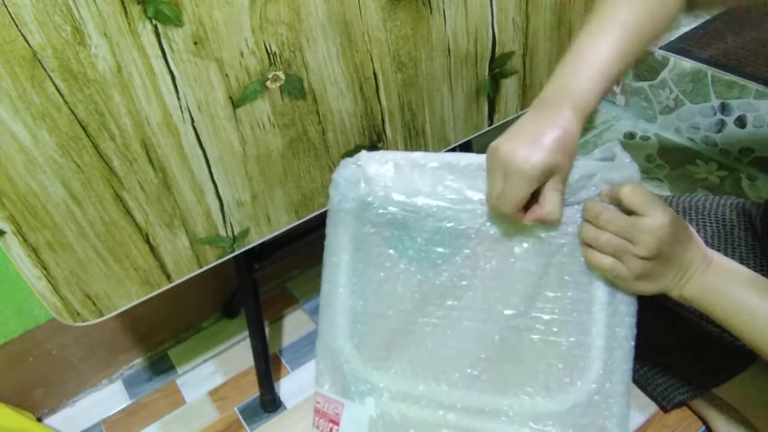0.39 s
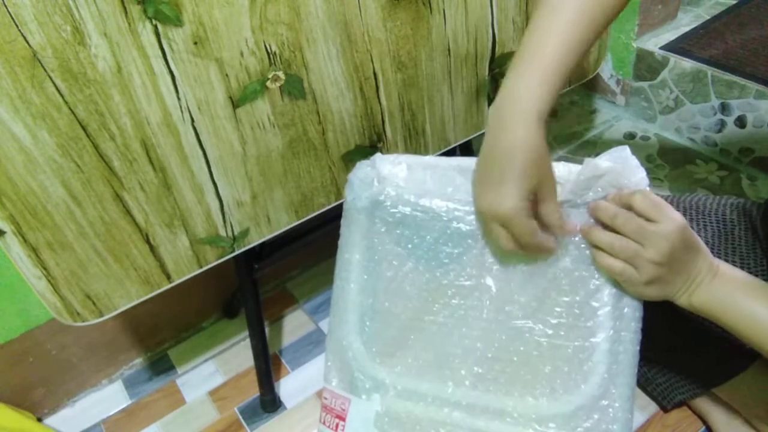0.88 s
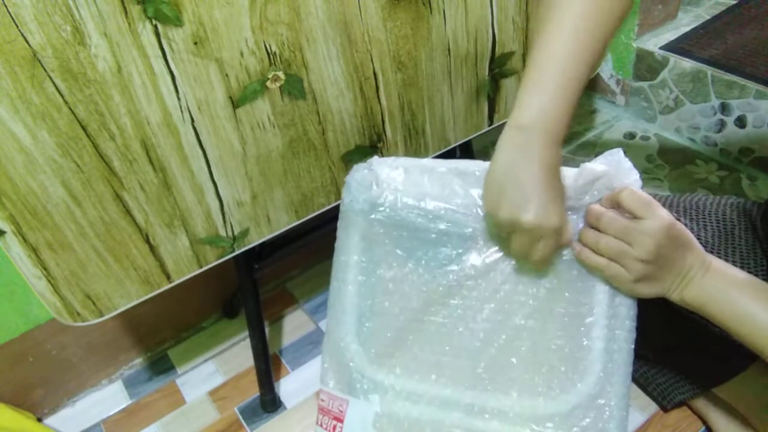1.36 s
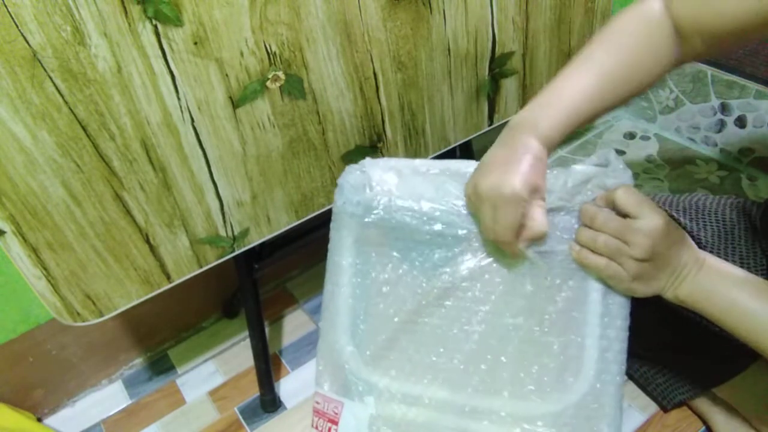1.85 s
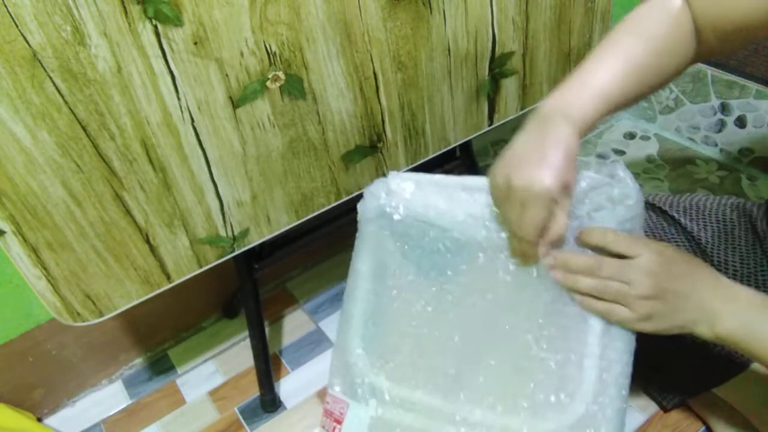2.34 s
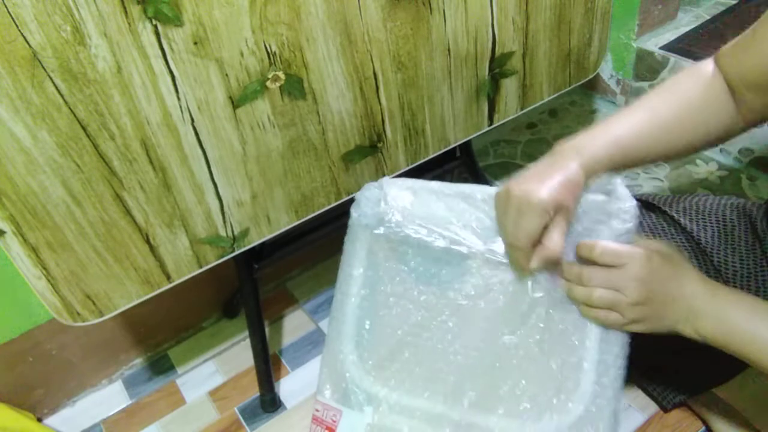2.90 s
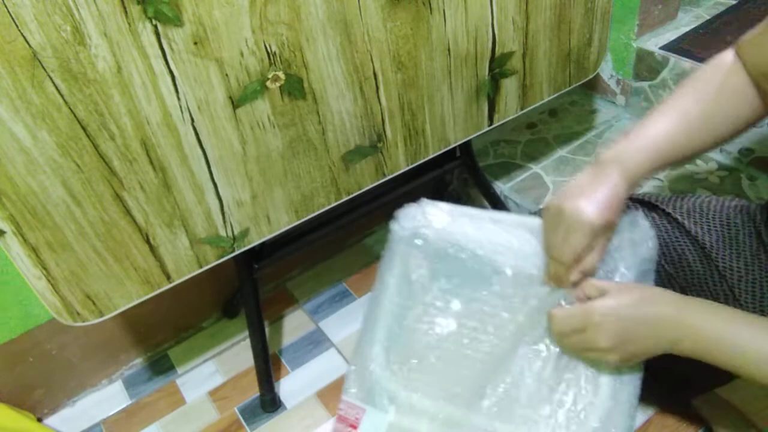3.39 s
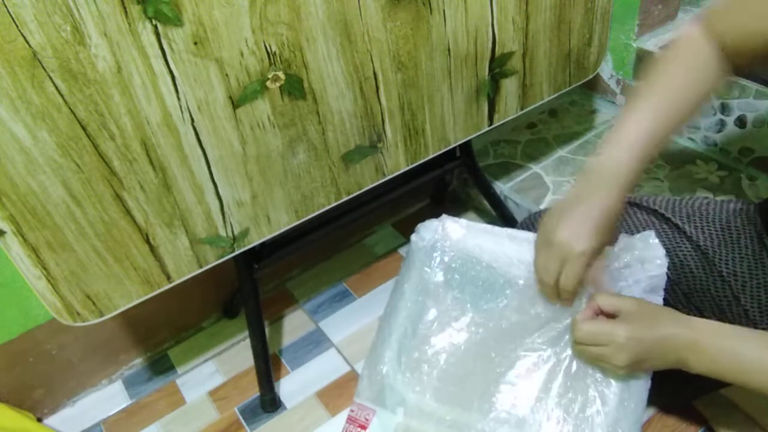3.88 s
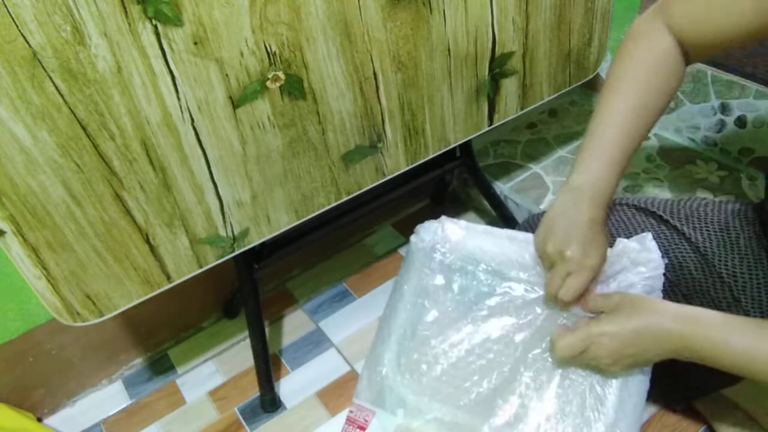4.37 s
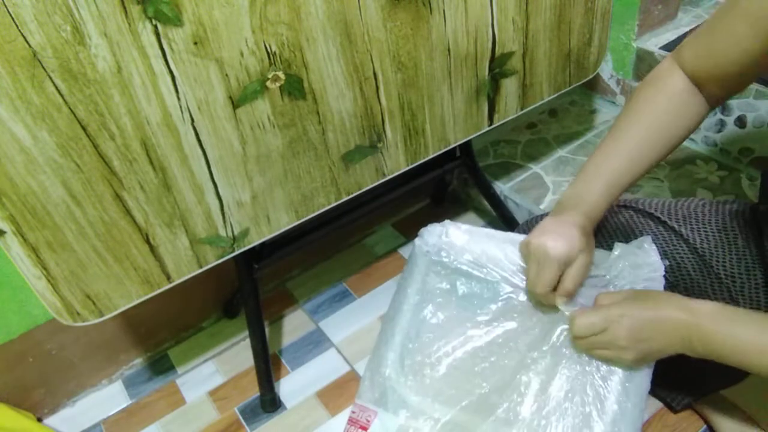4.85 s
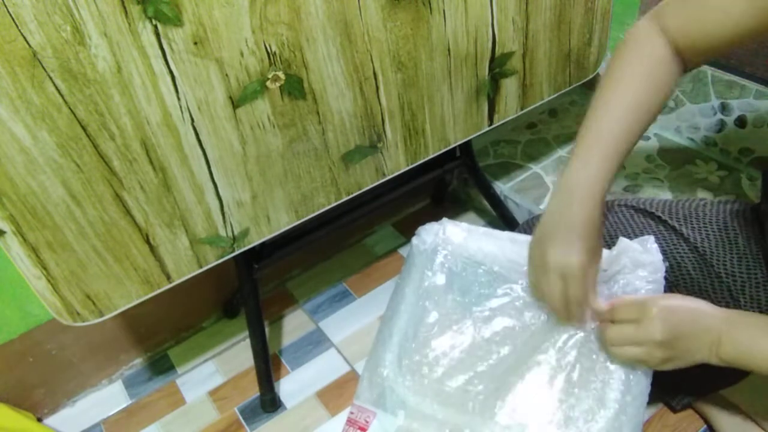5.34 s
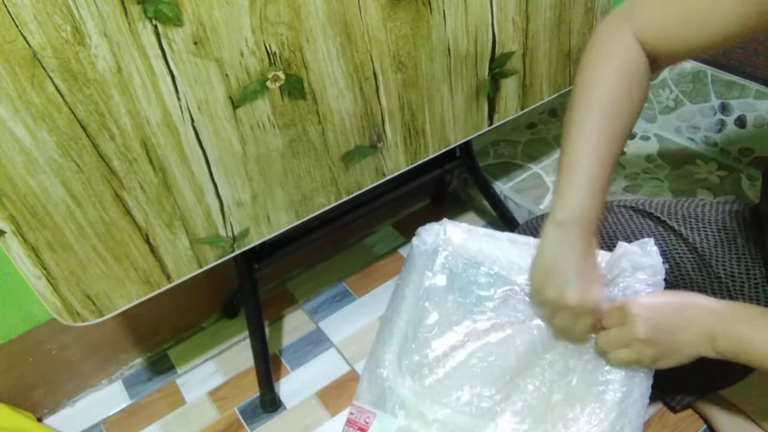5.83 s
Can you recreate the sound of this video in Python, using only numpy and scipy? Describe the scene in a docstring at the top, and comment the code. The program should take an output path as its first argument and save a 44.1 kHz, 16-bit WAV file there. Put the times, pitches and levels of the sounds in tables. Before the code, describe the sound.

Close to the microphone, hands pull plastic wrapping on a hollow box in a small hard-tiled room. Bright snaps come in irregular clusters, loud in the first half second, around one and a half seconds and strongest near 2.7, over a fine rustle of tiny pops. Soft hollow knocks accompany some snaps. Later the handling is lighter, above a faint low rumble.

```python
"""Fingers pick and pull at plastic film over a bubble-wrapped box, close by in a small tiled room.
Film: snaps of the creases, and a rustle of tiny pops between them, are short puffs of filtered noise.
Box: knocks and rubbing fingers excite hollow resonances and a dull thud from what the box rests on.
Nearby surfaces and the walls send the sounds back.
Under it all lies a low rumble of filtered noise, with a wavering hum late on."""
import sys
import numpy as np
from scipy import signal
from scipy.fft import rfft, irfft
from scipy.io import wavfile
from scipy.ndimage import uniform_filter1d, map_coordinates

SR = 44100
rng = np.random.default_rng(int(sys.argv[2]) if len(sys.argv) > 2 else 0)


def digitize_waveform(pressure):
    """Quantize a signal to 16-bit integers and store it at the path in sys.argv[1].

    Rows of a 2-D input are taken as channels; values are limited to [-1, 1].
    """
    field = np.atleast_2d(pressure).T
    bounded = np.clip(field, -1, 1)
    quanta = np.round(bounded * 32767).astype(np.int16)
    wavfile.write(sys.argv[1], SR, quanta)


def gain_from_db(level_db):
    """Convert decibel levels to linear amplitude factors (20 dB per decade)."""
    decades = np.asarray(level_db, float) / 20
    return 10 ** decades


N = 263718  # length in samples


# Loud snaps of the film, levels before the balance of the four parts is set:
# start_s [s], edge_db [dB], crease_db [dB over the edge], flap_db [dB over the edge]
FILM_SNAPS = [(0.0789, -23, -15.5, -14.5), (0.1227, -13, -9.5, -10.5), (0.148, -21, -18, -24),
              (0.177, -21, -19, -16), (0.2618, -14, -19, -19), (0.2795, -19, -14, -26),
              (0.2933, -8, -13, -11), (0.3036, -6, -9.5, -20.5), (0.3098, -9, -15, -12),
              (0.38, -19, -22, -22), (0.4227, -13, -9, -18.5), (0.6447, -19, -10.5, -12),
              (0.7834, -26.5, -11.5, -13.5), (0.8729, -24.5, -21, -18), (0.8772, -25.5, -7.5, -10.5),
              (0.8857, -23.5, -12, -24), (0.9885, -29, -16, -23), (1.03, -25, -13, -6.5),
              (1.065, -33, 3.5, -5), (1.106, -26.5, -9.5, -11), (1.2198, -32.5, -9, -5),
              (1.231, -19, -16.5, -32), (1.2444, -25.5, -18, -17), (1.2821, -26.5, -8.5, -33),
              (1.4346, -5, -13.5, -18.5), (1.4548, -19, -3.5, -16), (1.5206, -17.5, -16.5, -25),
              (1.542, -5, -11, -19), (1.6317, -27, -11, -16), (1.9069, -23.5, -17, -18),
              (1.9225, -16, -12, -16.5), (1.99, -24, -9.5, -22), (2.0226, -18.5, -11, -11),
              (2.054, -30, -14, -11), (2.0813, -27.5, -19, -9), (2.0867, -24, -12, -17),
              (2.3995, -28.5, -7.5, -9), (2.4654, -29, -27, -27), (2.476, -26, -27, -28),
              (2.4927, -25.5, -28, -38), (2.5314, -25.5, -24, -22), (2.5733, -24.5, -35, -24),
              (2.614, -25.5, -15, -19), (2.6667, -2, -12, -13), (2.6796, -16, -7, -15),
              (2.6893, -6, -12.5, -13), (2.7235, -14.5, -6, -14.5), (2.8803, -33, -4.5, -12),
              (2.9169, -38, -2, -1), (2.9887, -27, -6, -3.5), (3.0001, -30.5, -1.5, -7),
              (3.0746, -25, -9.5, -17), (3.112, -35, -6, -15), (3.2936, -31, -17, -19),
              (3.5218, -43.5, 0.5, -5), (3.6894, -28, -14.5, -20), (3.752, -26, -10, -12),
              (3.8065, -31, -4, -12), (4.0196, -17, -17, -23), (4.0346, -27.5, -12, -11),
              (4.2603, -28, -28, -35), (4.4107, -25, -24, -26), (4.4386, -31.5, -0.5, -17),
              (4.4572, -24, -17, -18), (4.513, -28, -7, -13), (4.5198, -31.5, 1.5, -14),
              (4.5371, -25.5, -9, -10), (4.563, -27.5, -9.5, -8.5), (4.6318, -30, -7.5, -12),
              (4.7501, -29.5, -10, -26), (4.7675, -27.5, -8, -17), (4.8002, -21.5, -22, -33),
              (4.9279, -28.5, -27, -41), (5.225, -19, -9.5, -14.5), (5.2776, -24, -8, -23),
              (5.31, -31, -19, -8), (5.441, -43, -7, -21), (5.5, -42.5, 0, 2.5), (5.5365, -32.5, -6, -25),
              (5.6162, -34, -4, -10.5), (5.697, -25.5, -14, -21), (5.802, -28, 2, -8.5),
              (5.887, -16.5, -20, -30)]
# Colour of a snap's bright edge: pitch_hz [Hz], level_db [relative dB per Hz]
EDGE_COLOUR = [(3530, -43.5), (6000, -7), (6960, -3.5), (8030, 0.5), (9230, -8), (9980, -10),
               (16000, -46.5)]
# Colour of the creases in the middle of a snap: pitch_hz [Hz], level_db [relative dB per Hz]
CREASE_COLOUR = [(2200, -23.5), (3100, -3.5), (4600, -1.5), (5300, -2.5), (6100, -1.5), (8000, -27)]
# Colour of the flapping sheet: pitch_hz [Hz], level_db [relative dB per Hz]
FLAP_COLOUR = [(590, -13.5), (1000, -2.5), (1080, 0.5), (1950, 8), (2420, 2), (3200, -5.5), (4160, -69),
               (7040, -120)]
# Colour of a snap's sharpest corner: pitch_hz [Hz], level_db [relative dB per Hz]
SIZZLE_COLOUR = [(8500, -28), (11500, 16), (16000, 1)]


def film():
    """Each buckle cracks at four sizes of crease; smaller ones tick and crackle all the while."""
    edge, crease = causal(EDGE_COLOUR), causal(CREASE_COLOUR)
    flap, sizzle = causal(FLAP_COLOUR), causal(SIZZLE_COLOUR)

    # loud snaps: the flap lasts longest, then the edge, the crease and the sizzle
    s, db, crease_db, flap_db = np.transpose(np.vstack([FILM_SNAPS, slips(count=7)]))
    each = np.ones(len(s))
    snaps = bursts(s, db - 4.5, 0.001764 * each, edge, size=512)
    snaps += bursts(s, db + crease_db + 5, 0.0012495 * each, crease, size=512)
    snaps += bursts(s, db + flap_db + 0.5, 0.002744 * each, flap, size=512)
    snaps += bursts(s, db - 16.5, 0.0007595 * each, sizzle, size=512)

    # rustle: the fingers never pull evenly
    pull_db, weight_db = hands()
    crackle_db = pull_db + 0.1 * wobble(rate=18)
    pops = gain_from_db(crackle_db - 6) * crackle(spread_db=1.5, life_s=0.0012, clump=0.5, count=2400)
    pops += gain_from_db(crackle_db - 9) * crackle(spread_db=3.0, life_s=0.0011, clump=0.3, count=260)
    folds = gain_from_db(crackle_db - 3) * crackle(spread_db=3.5, life_s=0.0012, clump=0.5, count=900)
    rustle = coloured(pops, edge)
    rustle += gain_from_db(-5) * coloured(pops + 0.78 * folds, crease)
    # a light touch crinkles crisper, a heavy one brings out the flap of the sheet
    rustle += coloured(gain_from_db(-20 - 0.65 * weight_db) * folds, sizzle)
    rustle += coloured(gain_from_db(-4.5 + 0.4 * weight_db) * (0.69 * pops + 0.28 * folds), flap)
    return snaps + rustle


def slips(count):
    """Stuck film peels off in ever quicker slips; gives rows with the columns of the snaps."""
    first_s, gap_s, quickens = 1.362, 0.0124, 0.87  # first slip, first gap, each gap over the last
    k = np.arange(count)
    s = first_s + gap_s * (1 - quickens ** k) / (1 - quickens)
    db = -19.5 + 4.5 * (k == 0)  # the first slip breaks away louder
    return np.transpose(np.broadcast_arrays(s, db, -10.5, -15.5))


# The fingers grip and pull the film:
# start_s [s], held_s [s], pull_db [dB], weight_db [dB, how hard they lean on the box]
PULL_GRIPS = [(-.02, 0.017, -30, -3.5), (.06, 0.027, -51, 7), (.14, 0.11, -43, -4), (.33, 0.13, -44.5, -2),
              (0.499, 0.14, -44.5, -4), (.66, .14, -51, 4.5), (.90, 0.093, -50.5, 9.5),
              (1.02, .12, -46.5, 0.5), (1.22, 0.13, -45, 8), (1.34, 0.12, -38.5, 2.5),
              (1.598, 0.23, -47, -4.5), (1.899, 0.14, -47, 7), (2.00, 0.069, -38, 2.5),
              (2.12, 0.13, -50, 5), (2.299, 0.14, -50.5, -3.5), (2.471, 0.26, -43.5, -7.5),
              (2.78, 0.075, -45, -5.5), (2.891, 0.11, -41, 4), (2.97, 0.071, -43, 2.5),
              (3.03, 0.095, -48.5, 7.5), (3.13, 0.22, -59.5, 11.5), (3.288, .16, -49, -1),
              (3.498, 0.04, -44.5, 2), (3.689, 0.12, -48, 5), (3.90, 0.23, -46, 6),
              (4.009, 0.03, -39.5, -2), (4.09, .05, -48.5, -1), (4.198, 0.044, -43, 1),
              (4.282, 0.11, -46.5, -1.5), (4.40, .26, -44.5, -2.5), (4.67, 0.14, -45.5, -5),
              (4.84, 0.17, -49.5, -13), (4.981, 0.086, -40.5, -3), (5.08, 0.078, -46, 6.5),
              (5.208, 0.09, -44, 4.5), (5.44, .23, -51, -3), (5.698, 0.14, -48.5, 1),
              (5.79, .22, -45.5, -6.5)]


def hands():
    """Pull and weight in dB at each moment: every grip rises, holds and lets go."""
    grip_s, let_go_db_per_s, rest_db = 0.039, 330, -59
    s, held_s, db, weight_db = np.transpose(PULL_GRIPS)[:, :, None]
    coarse = np.arange(0, N, 32)  # every 32nd sample is enough
    t = coarse / SR - s
    rise = np.clip(t / grip_s + 0.5, 0, 1) ** 2  # builds around the start of the pull
    slack_db = let_go_db_per_s * np.maximum(t - held_s, 0)
    power = rise * gain_from_db(2 * (db - slack_db))
    total = power.sum(axis=0) + gain_from_db(2 * rest_db)
    pull = 10 * np.log10(total)
    weight = (power * weight_db).sum(axis=0) / total
    return [np.interp(np.arange(N), coarse, row) for row in (pull, weight)]


def crackle(spread_db, life_s, clump, count):
    """Tiny white pops come in clumps; a positive spread makes a few louder, a negative one a few softer."""
    chance = rng.random((count, 3))
    odds = np.cumsum(np.exp(clump * wobble(rate=40)))
    s = np.interp(chance[:, 0], odds / odds[-1], np.arange(N) / SR)
    size_db = np.minimum(-spread_db * np.log(chance[:, 1] + 1e-9), 3 * spread_db)
    lives_s = life_s * (0.5 + chance[:, 2])
    white = np.eye(128)[0]
    pops = unit(bursts(s, size_db, lives_s, white, size=128)[0])
    # partly even out the slow changes in strength
    strength = np.abs(uniform_filter1d(uniform_filter1d(pops ** 2, size=2500), size=2500))
    return unit(pops / (strength + 0.1) ** 0.4)


def bursts(s, db, life_s, response, size):
    """Puffs of coloured noise that swell, hold for about their life, then die; db is the held level.
    Row 0 is what one direction gets, row 1 the even colour that all directions send to the walls."""
    u = np.arange(size) / SR / life_s[:, None]  # time in lives
    swell = (1 - np.exp(-u / 0.28)) * gain_from_db(-22 * np.maximum(u - 0.6, 0))
    strength = (gain_from_db(db) * np.linalg.norm(swell, axis=1))[:, None]
    noise = swell * rng.standard_normal(u.shape)
    puffs = signal.fftconvolve(noise, response[None, :size], axes=1)
    puffs *= strength / np.linalg.norm(puffs, axis=1)[:, None]
    clicks = strength * np.pad(response[:size], (0, size - 1))
    # add every puff and click at its own place in time
    at = np.round(s * SR).astype(int)[:, None] + np.arange(2 * size - 1)
    return np.array([np.bincount(at.ravel(), rows.ravel(), N + 2 * size)[:N] for rows in (puffs, clicks)])


# Fingers knock the box, levels before the balance of ring and thud is set:
# start_s [s], ring_db [dB], thud_db [dB over the ring]
BOX_KNOCKS = [(0.122, -27.5, -20.5), (0.261, -41, -24), (0.292, -16.5, -31), (0.303, -22, -24),
              (0.423, -26.5, -25), (0.642, -34, -15), (1.112, -30, -21.5), (1.135, -35.5, -19),
              (1.363, -36, -35), (1.434, -33, -43), (1.541, -37.5, -19), (1.904, -43.5, -20),
              (2.022, -41, -10), (2.055, -37, -6), (2.08, -29.5, -12), (2.179, -37, -17.5),
              (2.499, -40.5, -9.5), (2.666, -31, -17), (2.69, -27.5, -36), (2.92, -43.5, -8.5),
              (2.999, -46, -9), (3.067, -38.5, -7.5), (3.524, -43, -23), (3.752, -38.5, -33),
              (3.937, -32, -19.5), (3.95, -37, -22), (3.969, -43, -12), (4.025, -45, -21),
              (4.118, -51.5, 2.5), (4.219, -52, -2), (5.07, -43, -33.5), (5.124, -41, -7),
              (5.225, -44, -12), (5.306, -41.5, -9)]
# Resonances of the hollow box: pitch_hz [Hz], width_hz [Hz], level_db [relative dB]
BOX_RESONANCES = [(491, 93, 1), (749, 113, 6), (916, 76, 3.5), (1260, 570, -3.5)]
# Colour of the thud of what the box rests on: pitch_hz [Hz], level_db [relative dB per Hz]
THUD_COLOUR = [(75, -45.5), (120, -8.5), (215, -0.5), (360, 2.5), (600, -17.5)]


def box():
    """A knock rings the box briefly and thuds into its support; sliding fingers stir both."""
    hollow, support = ringing(BOX_RESONANCES), causal(THUD_COLOUR)
    s, db, thud_db = np.transpose(BOX_KNOCKS)
    blows = bursts(s, db + 3.5, np.full(len(s), 0.0018), hollow, size=1024)
    thuds = bursts(s, db + thud_db + 9.5, np.full(len(s), 0.004), support, size=1024)
    # the box is rubbed more as the pull and the weight grow
    pull_db, weight_db = hands()
    rub_db = -62.5 + 0.66 * (pull_db - pull_db.mean()) + weight_db
    rub = gain_from_db(rub_db) * crackle(spread_db=-1.0, life_s=0.0025, clump=0.6, count=1200)
    stirred = gain_from_db(-1) * hollow[:4096] + gain_from_db(-10) * support  # both 4096 samples long
    return blows + thuds + coloured(rub, stirred)


def ringing(modes, size=8192):
    """Response of energy 1 of a row of resonances, added with alternating sign."""
    f = np.fft.rfftfreq(size, 1 / SR)
    total = 0
    for k, (centre, width, db) in enumerate(modes):
        damping = 1j * f * width
        total = total + (-1) ** k * gain_from_db(db) * damping / (centre * centre - f * f + damping)
    response = irfft(total)
    return response / np.linalg.norm(response)


# Echoes off the box top, table and floor: delay_ms [ms, before its random shift], level_db [dB]
NEAR_ECHOES = [(1.601, -13.5), (3.098, -9.5), (5.001, -32.5)]


def nearby(x, size=2000):
    """Nearby surfaces return each sound upside down within a few ms.
    The delays are drawn anew for each short stretch, so the echoes do not sound pitched."""
    ms, db = np.transpose(NEAR_ECHOES)
    out = np.pad(x, (0, SR))
    for start in range(0, N, size):
        piece = x[start:start + size]
        lags = np.round(ms * rng.uniform(0.85, 1.15, len(ms)) * SR / 1000).astype(int)
        for lag, gain in zip(lags, gain_from_db(db)):
            out[start + lag:][:len(piece)] -= gain * piece
    return out[:N]


# How long the tiled room rings: pitch_hz [Hz], t60_s [s to fall by 60 dB]
ROOM_DECAY = [(200, 0.23), (600, 0.15), (1500, 0.25), (4000, 0.23), (9000, 0.18), (15000, 0.12)]


def room(x, size=3000):
    """Tiled walls answer with fading noise.
    Each short stretch gets a new random tail, so no single tail colours all sounds."""
    out = np.zeros(N + SR)
    for start in range(0, N, size):
        hz, t, z = signal.stft(rng.standard_normal(SR // 2), SR, nperseg=256)
        fade = gain_from_db(-60 * t / along(ROOM_DECAY, hz)[:, None])
        tail = signal.istft(z * fade, SR, nperseg=256)[1]
        tail *= 1 - np.exp(-np.arange(len(tail)) / SR / 0.0064)  # the first walls are a few ms away
        wet = signal.fftconvolve(x[start:start + size], tail / np.linalg.norm(tail))
        out[start:][:len(wet)] += wet
    return out[:N]


# Colour of the rumble: pitch_hz [Hz], level_db [relative dB per Hz]
RUMBLE_COLOUR = [(24, -52), (40, -22), (102, 2), (373, -38), (506, 2), (600, -21), (780, -12), (1320, -120)]
# Course of the rumble, before its random wavering: time_s [s], level_db [dB]
RUMBLE_COURSE = [(0.0, -70), (3.4, -77), (5.98, -81.5)]
# Course of the hum: time_s [s], level_db [dB]
HUM_COURSE = [(4.85, -91), (5.0, -68), (5.2, -67), (5.42, -73), (5.62, -78), (5.85, -71), (5.98, -68)]


def rumble():
    """Dull background rumble of filtered noise; late on, a low hum of wavering pitch swells twice."""
    noise = unit(coloured(rng.standard_normal(N), causal(RUMBLE_COLOUR, size=16384)))
    noise_db = curves(RUMBLE_COURSE)[0] + 4.3 * wobble(rate=1.6)
    pitch_hz = 70 + 2.0 * wobble(rate=3.5)
    hum = np.sqrt(2) * np.sin(2 * np.pi * np.cumsum(pitch_hz) / SR)
    return gain_from_db(noise_db) * noise + gain_from_db(curves(HUM_COURSE)[0]) * hum


def unit(x):
    """x scaled to an rms of 1."""
    return x / np.sqrt(np.mean(x ** 2) + 1e-20)


def along(points, hz):
    """Reads a curve of (Hz, value) points on a log frequency axis."""
    f, v = np.transpose(points)
    return np.interp(np.log(hz + 1), np.log(f + 1), v)


def curves(rows):
    """One value per sample for each column after the time."""
    s, *cols = np.transpose(rows)
    return [np.interp(np.arange(N) / SR, s, c) for c in cols]


def wobble(rate):
    """A smooth random curve, rate knots a second."""
    knots = rng.standard_normal(int(N * rate / SR) + 4)
    return map_coordinates(knots, [np.arange(N) * rate / SR])


def coloured(x, response):
    """x filtered through a response."""
    return signal.fftconvolve(x, response)[:N]


def causal(spectrum, size=4096):
    """Minimum-phase response of energy 1 with the given spectrum: its energy comes as early as it can."""
    level = gain_from_db(along(spectrum, np.fft.rfftfreq(size, 1 / SR)))
    cepstrum = irfft(np.log(level + 1e-4))
    # folding the cepstrum forward in time makes the phase minimal
    cepstrum[1:size // 2] *= 2
    cepstrum[size // 2 + 1:] = 0
    response = irfft(np.exp(rfft(cepstrum)))
    return response / np.linalg.norm(response)


def scene():
    """The hands at work, their echoes and the background."""
    sheet, knocks = film(), box()
    direct = nearby(sheet[0] + knocks[0])
    walls = room(gain_from_db(-5) * sheet[1] + gain_from_db(-2) * knocks[1])
    return (direct + walls + rumble())[None]


def top_cut(x):
    """Nothing passes above the cut-off."""
    return signal.sosfilt(signal.butter(12, 17000, fs=SR, output="sos"), x)


def record(dry):
    """The microphone drops the deepest bass and rounds off the highest peaks."""
    bass_cut = signal.butter(3, 55, "high", fs=SR, output="sos")
    x = signal.sosfilt(bass_cut, dry)
    x = x / (1 + np.abs(x / 0.9) ** 4) ** (1 / 4)  # no peak passes 0.9
    return top_cut(x)


dry = scene()
out = record(dry)
digitize_waveform(out)
```